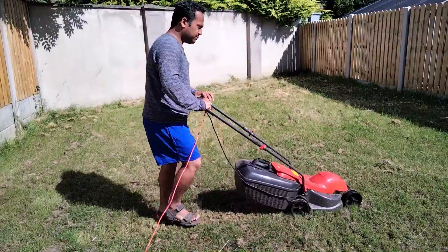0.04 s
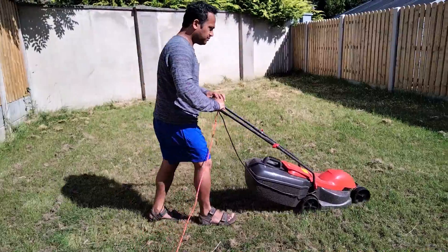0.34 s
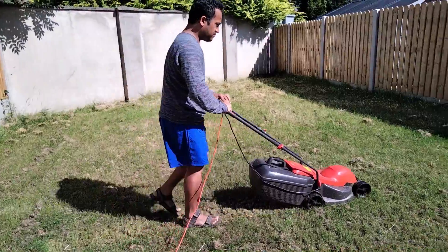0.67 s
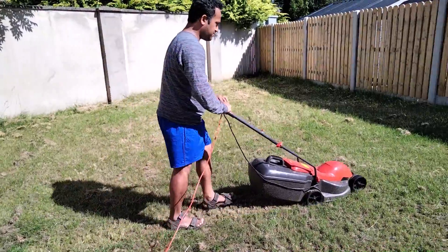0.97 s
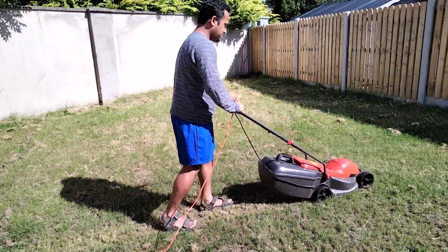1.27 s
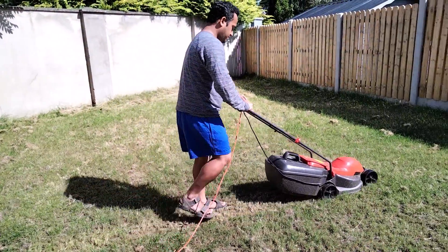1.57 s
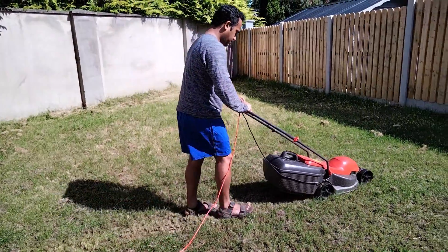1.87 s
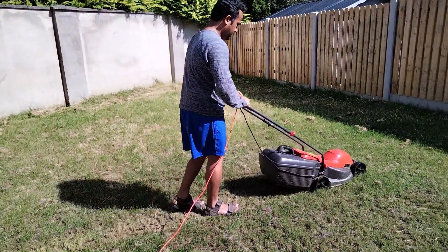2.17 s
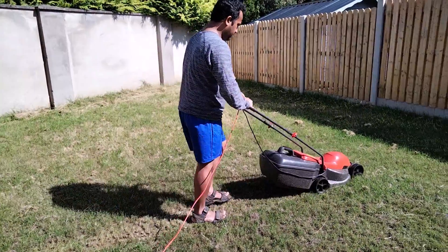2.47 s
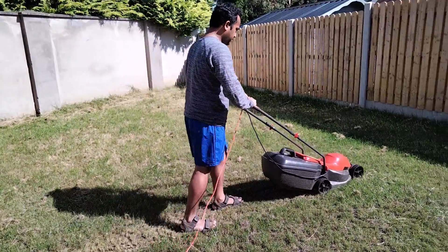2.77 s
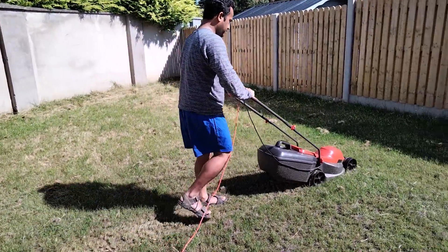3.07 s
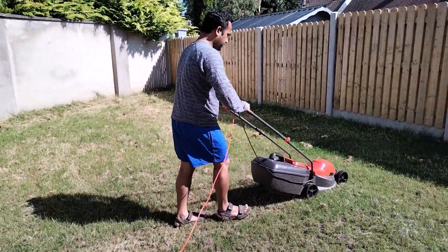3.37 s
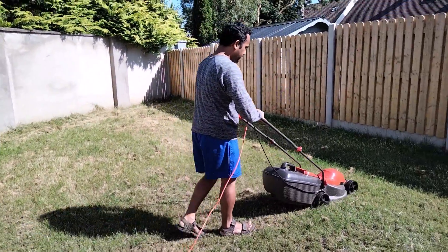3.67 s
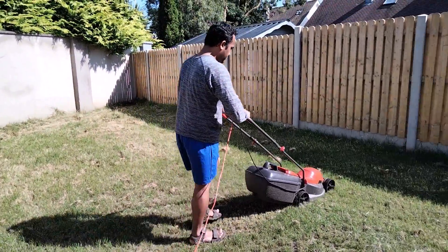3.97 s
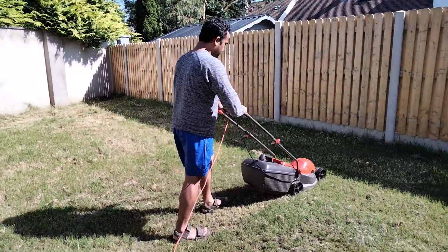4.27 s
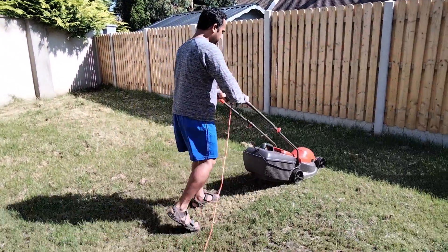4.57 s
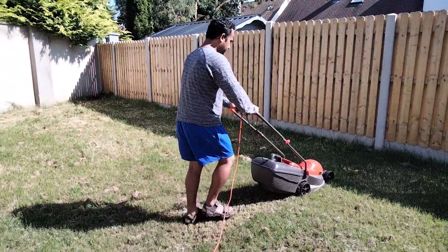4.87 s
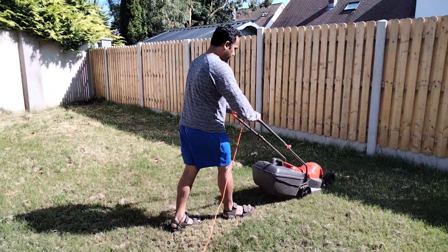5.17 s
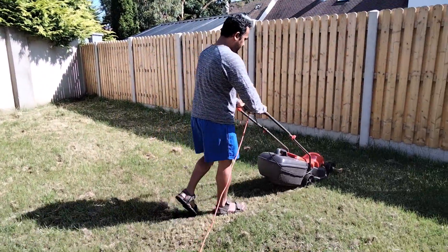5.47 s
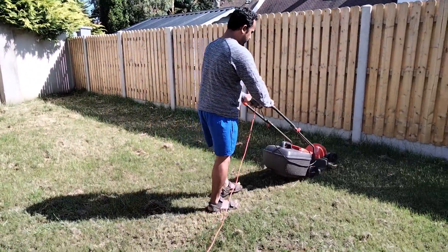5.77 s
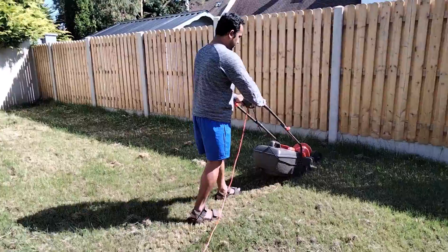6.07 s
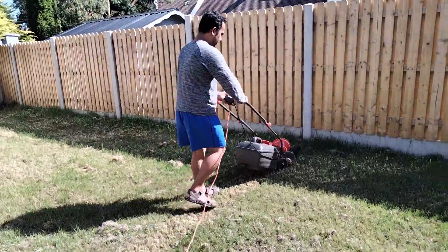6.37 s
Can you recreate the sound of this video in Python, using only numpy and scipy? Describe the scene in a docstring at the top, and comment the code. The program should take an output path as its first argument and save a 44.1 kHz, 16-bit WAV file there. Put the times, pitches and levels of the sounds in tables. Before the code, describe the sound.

An electric lawnmower runs from start to finish, a few metres away on a garden lawn. The blade gives a low, churning drone, topped by a bright hiss of cut grass, gritty rushing air and a thin, wavering motor whine. Light wind rumbles on the microphone around 0.5 seconds. Twigs and grit tick sharply on the plastic housing at about 1.4, 1.6 and 2.5 seconds, more faintly at 3.1 and 4.6, then in a small cluster from 5 to 5.3 seconds. The level often ducks for an instant just after these hits. The pitch sinks as the blade bogs down in thicker grass around 3.2 seconds, recovers by 4, then sinks again near 6.2 and starts to rise. Here and there the sound turns hollow for a split second. The mower is still cutting at the end, about 6.6 seconds in.

```python
"""A corded electric rotary mower hums and hisses across a fenced lawn, a few metres away.
The blade drones and churns the air in the deck, bogging down in thicker grass; cut stalks hiss,
the belt-driven motor whines, and twigs tick on the housing. The level sags now and then,
the midrange drops out for instants, and a little wind brushes the microphone."""
import sys
import numpy as np
from scipy import signal
from scipy.fft import rfft, irfft
from scipy.io import wavfile

SR = 44100
rng = np.random.default_rng(int(sys.argv[2]) if len(sys.argv) > 2 else 0)


def generate_wav(sig):
    """Save sig (samples, or channels by samples) to the path in sys.argv[1] as 16-bit PCM at SR."""
    pcm = np.round(np.clip(np.atleast_2d(sig).T, -1, 1) * 32767).astype(np.int16)
    wavfile.write(sys.argv[1], SR, pcm)


N = 292508
T = np.arange(N) / SR

# how fast the blade turns: time_s, speed_hz
BLADE_SPEED = [(0.0, 56.2), (0.09, 55.04), (1.16, 58.2), (1.53, 55.37), (1.94, 57.18), (2.68, 54.66),
               (2.88, 51.6), (2.99, 51.1), (3.21, 47.36), (3.49, 52.5), (3.75, 53.06), (4.03, 55.67),
               (4.25, 53.72), (4.6, 53.36), (4.76, 51.93), (5.3, 54.21), (5.87, 51.89), (6.18, 47.3),
               (6.41, 49.88), (6.63, 51.6)]
# fader rides on the main layers: time_s, blade_pass_db, octave_db, churn_db, hiss_db
LAYER_RIDES = [(0.0, -35, -28, -27.5, -20.5), (0.35, -31, -20, -23, -21.5),
               (1.24, -31.0, -20, -25.5, -22.0), (1.88, -30.0, -23, -25.5, -20),
               (2.26, -32.0, -24.5, -24.5, -20), (2.45, -32, -27.5, -27.0, -21),
               (3.05, -29.5, -24.0, -24.0, -19.5), (3.38, -37, -32.5, -28, -23.0),
               (3.53, -27, -19, -22.5, -20.5), (3.81, -30.5, -30.5, -27, -20.5),
               (4.04, -31.5, -21.5, -23.5, -19), (4.26, -31.0, -24.5, -25.5, -20),
               (4.87, -27.5, -32, -27.0, -19.5), (5.13, -30, -25, -27.5, -19.5),
               (5.61, -31.5, -25, -28.5, -20), (6.05, -31, -24.0, -25.5, -19),
               (6.22, -39.5, -27.5, -30.5, -21), (6.63, -33, -34, -28.5, -21)]
# weaker lines swell and fade as the mower turns; the first three ride on the hiss fader, the last
# on the octave: time_s, drone_db, whine_db, whistle_db, imbalance_db
TONE_RIDES = [(0, -17, -15, -18, -21), (.9, -20.5, -14.5, -6, -15.5), (2.1, -8.5, -24.5, -11.5, -7.5),
              (2.9, -16.5, -17.5, -18, -18), (3.9, -12, -11, -24.5, -11), (4.8, -11, -18.5, -12, -10.5),
              (5.4, -13.5, -18.5, -20, -16.5), (6.63, -19.5, -23, -5, -14)]
# upper blade harmonics, on the churn fader: order, level_db, roughness, full_load_change_db
CHOP_HARMONICS = [(5, -9.5, 0.5, -9), (6, -3, 0.18, -4), (7, -11.5, 0.5, -9.5), (8, -13.5, 0.31, 7),
                  (9, -11.5, 0.4, -14.5), (10, -12.5, 0.5, 7), (11, -18, 0.6, -5), (12, -18.5, 0.4, 3),
                  (13, -27.5, 0.4, -5), (14, -20, 0.8, -9), (16, -21.5, 0.4, -13.5), (18, -30, 0.7, -8),
                  (20, -23.5, 0.7, -7), (22, -27.5, 0.3, 3), (24, -31.5, 0.2, 8), (30, -30, 0.7, 4.5),
                  (32, -31, 0.7, 11.5)]
# thick tufts push up the chop and, by less, the hiss: centre_s, half_width_s, boost_db
THICK_TUFTS = [(2.37, .05, 4), (2.77, 0.015, 6.5), (3.04, 0.062, 2.5), (3.49, 0.045, 4.5), (4.07, 0.046, 1),
               (4.74, 0.033, 4), (4.87, 0.046, 2), (5.23, 0.032, 4), (6.02, .06, 1), (6.35, .03, 6.5)]
# EQ of the air churning in the deck: frequency_hz, gain_db
DECK_EQ = [(60, -19.5), (110, -7), (165, -6.5), (230, 0), (310, 1), (400, -3), (530, -5.5), (610, -9),
           (730, -21), (1100, -44)]
# EQ of the cutting hiss: frequency_hz, gain_db
GRASS_EQ = [(5000, -42), (5500, -8), (5750, -5.5), (6000, -4), (6300, 2.5), (6650, -.5), (7000, 0.5),
            (7550, 0), (7800, -2.5), (8000, -15.5), (8250, -18), (8500, -29.5)]
# EQ of the cooling air: frequency_hz, gain_db
AIR_EQ = [(400, 0), (750, -9.5), (1000, -8.5), (1300, -7.5), (1650, -8.5), (2000, -10), (2350, -7),
          (2700, -2.5), (3100, -1.5), (3450, -2.5), (4300, -2), (4800, -1.5), (5250, -5.5), (5600, -7),
          (6100, -30)]
# EQ of the plastic housing's ring: frequency_hz, gain_db
HOUSING_EQ = [(3400, -6.5), (3700, -7.5), (3840, 3.5), (3980, -9), (4250, -30.5)]
# twigs and grit hitting the mower: start_s, peak_db, centre_hz, bandwidth_hz, t60_s
TWIG_HITS = [(1.369, -5, 3600, 2600, 0.016), (1.378, -12, 2900, 1800, 0.025),
             (1.587, -6.5, 4440, 3200, .02), (1.596, -6.5, 6000, 3400, .02), (2.49, -11, 2903, 555, 0.034),
             (3.081, -16.5, 2507, 2020, 0.026), (4.609, -12, 3240, 1998, 0.022),
             (4.982, -10, 6380, 2014, .015), (5.012, -7, 5940, 620, 0.15), (5.044, -10, 6240, 2200, 0.013),
             (5.269, -3, 6505, 2220, 0.015), (5.308, -14, 3800, 1983, 0.046)]
# EQ of the wind rumble: frequency_hz, gain_db
WIND_EQ = [(8, 5.5), (25, -2), (42, 7), (60, 3), (85, -5), (160, -28)]
# gusts on the microphone: centre_s, half_width_s, level_db
GUSTS = [(0.414, 0.026, -38), (0.48, 0.034, -25), (0.648, .03, -44), (.78, .025, -36), (4.466, .06, -44),
         (4.948, .1, -58)]
# dips in level, mostly just after a strike or a tuft: start_s, length_s, hum_depth_db, hiss_depth_db
LEVEL_SAGS = [(1.37, .09, 6, 2), (1.576, 0.11, 9.5, 9.5), (2.5, 0.095, 9, 6), (2.778, .1, 9.5, 4.5),
              (3.087, 0.15, 2.5, -1.5), (4.105, 0.11, 3.5, 3), (4.928, 0.082, 3, 4), (5.007, .11, 7.5, 7.5),
              (5.25, 0.13, 12, 5.5), (6.125, 0.062, 6, -0.5), (6.42, .099, 3, 3)]
# brief holes in the midrange, the deeper the longer: centre_s, depth_db
MID_DROPOUTS = [(0.401, 17), (.867, 7), (1.401, 17), (2.15, 14), (2.19, 21), (2.471, 24), (2.542, 32),
                (2.771, 19.5), (2.857, 14), (2.933, 23), (3.068, 15), (3.133, 13), (3.193, 15),
                (3.69, 18.5), (3.887, 28), (3.962, 16), (5.092, 20), (5.16, 17), (5.459, 15), (5.586, 19),
                (6.096, 21), (6.141, 18), (6.286, 17), (6.457, 21), (6.501, 21)]

FREE_HZ, LOADED_HZ = 58, 48  # blade speed at no load and at full load
BELT_RATIO, ARMATURE_SLOTS = 4.603, 12
WHISTLE_ORDER, BLADE_PASS_ORDER = 133, 2  # multiples of the blade speed
COOLING_DB, RING_DB = (-5.5, -7.5), (-10.5, -18.5)  # on the hiss fader: (side-on, facing away)
TUFT_HISS_SHARE, BREEZE_DB, TOP_HZ = 0.43, -55, 8400
HUM_FALL_S, HISS_FALL_S, RECOVER_S = 0.011, 0.045, 0.033
DROPOUT_LOW_HZ, DROPOUT_HIGH_HZ, DROPOUT_DB_PER_S = 620, 5760, 1399


def blade(turns, load, tuft_db, pass_db, octave_db, churn_db, imbalance_db):
    """Two tips hum at twice the blade speed, imbalance adds an odd order, and tufts harden the chop."""
    blade_pass = tone(turns, BLADE_PASS_ORDER, rough=0.042, flutter_hz=17)
    octave = undb(-2) * tone(turns, order=4, rough=0.072, flutter_hz=11)
    imbalance = undb(imbalance_db) * tone(turns, order=3, rough=0.16, flutter_hz=12)
    chop = 0
    for order, db, rough, load_db in CHOP_HARMONICS:
        # the gap between deck and lawn keeps changing, so each harmonic swells and fades on its own
        swell_db = 2 * walk(7)
        chop += undb(db + load * load_db + swell_db) * tone(turns, order, rough, flutter_hz=21)
    wakes = colour(rng.standard_normal(N) * tip_pulse(turns, depth=0.66), DECK_EQ)
    wakes *= undb(1.6 * walk(9.3))
    churn = undb(tuft_db - 0.53) * chop + undb(-4.5) * wakes
    return undb(pass_db) * blade_pass + undb(octave_db) * (octave + imbalance) + undb(churn_db) * churn


def grass(turns):
    """Countless stalks snap at the blade tips and melt into the hiss of the air."""
    cuts = snaps(per_second=3000, spread_db=1.5) * tip_pulse(turns, depth=0.55)
    return colour(rng.standard_normal(N) + 0.54 * cuts, GRASS_EQ) * undb(0.97 * walk(28))


def cooling_air(turns):
    """Air and clippings rush through the housing in a gritty stream."""
    rush = rng.standard_normal(N) + 0.5 * snaps(per_second=900, spread_db=1)
    return colour(rush * tip_pulse(turns, depth=0.032), AIR_EQ) * undb(0.78 * walk(24))


def motor(turns, drone_db, whine_db, whistle_db):
    """The motor outruns the blade it belts: shaft drone and buzz, slot whine, a thin whistle on top."""
    shaft = BELT_RATIO * turns
    drone = tone(shaft, order=1, rough=0.25, flutter_hz=10)
    buzz_orders = (15, 16, 19, 20, 22, 24, 25, 26, 27, 28)
    buzz = sum(tone(shaft, order, rough=0.85, flutter_hz=10) for order in buzz_orders)
    whine = tone(shaft, ARMATURE_SLOTS, rough=0.7, flutter_hz=22)
    # the load changes with each blade pass, which puts a second line under the whine
    sideband = tone(turns, ARMATURE_SLOTS * BELT_RATIO - BLADE_PASS_ORDER, rough=0.98, flutter_hz=15)
    whistle = tone(turns, WHISTLE_ORDER, rough=0.9, flutter_hz=45)
    return (undb(drone_db) * drone + undb(-26.5) * buzz
            + undb(whine_db) * (whine + undb(-10.5) * sideband) + undb(whistle_db) * whistle)


def housing():
    """Clippings rasp on the plastic shell and keep one resonance ringing."""
    return colour(rng.standard_normal(N), HOUSING_EQ)


def twigs():
    """Each hit is a sharp click, then a short rattle in a cluster of plastic resonances."""
    out = np.zeros(N)
    t = T[:SR // 4]
    for start_s, peak_db, centre_hz, width_hz, t60_s in TWIG_HITS:
        rattle = rng.standard_normal(len(t)) * undb(-60 * t / t60_s)
        click = 9 * (t == 0)
        edges_hz = [centre_hz - width_hz / 2, centre_hz + width_hz / 2]
        ring = signal.sosfilt(signal.butter(3, edges_hz, "band", fs=SR, output="sos"), click + rattle)
        start = int(start_s * SR)
        out[start:start + len(t)] += (undb(peak_db) * ring / np.abs(ring).max())[:N - start]
    return out


def wind():
    """A light breeze and a few gusts rumble on the microphone."""
    gusts = swells([(centre_s, half_s, undb(db)) for centre_s, half_s, db in GUSTS])
    return colour(rng.standard_normal(N), WIND_EQ) * (undb(BREEZE_DB + 2.5 * walk(3)) + gusts)


def sags():
    """The hum ducks first, the hiss follows, and both recover together: dB lost by each."""
    hum_db, hiss_db = 0, 0
    for start_s, length_s, hum_depth_db, hiss_depth_db in LEVEL_SAGS:
        age_s = T - start_s
        held = np.clip(1 - (age_s - length_s) / RECOVER_S, 0, 1)
        hum_db += hum_depth_db * held * np.clip(age_s / HUM_FALL_S, 0, 1)
        hiss_db += hiss_depth_db * held * np.clip(age_s / HISS_FALL_S, 0, 1)
    return hum_db, hiss_db


def midrange_dropouts(x):
    """The mids duck and return at a set rate while lows and highs carry on."""
    hz = np.arange(N // 2 + 1) * SR / N
    mids = irfft(rfft(x) * (hz > DROPOUT_LOW_HZ) * (hz < DROPOUT_HIGH_HZ), N)
    drop_db = sum(np.maximum(depth_db - DROPOUT_DB_PER_S * np.abs(T - centre_s), 0)
                  for centre_s, depth_db in MID_DROPOUTS)
    return x - mids * (1 - undb(-drop_db))


def tone(turns, order, rough, flutter_hz):
    """A line near rms 1 at a multiple of a shaft's speed; turbulence roughens it (0 pure, 1 all noise)."""
    angle = 2 * np.pi * (order * turns + rng.random())
    shaken = walk(flutter_hz) * np.cos(angle) + walk(flutter_hz) * np.sin(angle)
    return np.sqrt(2 * (1 - rough ** 2)) * np.sin(angle) + rough * shaken


def tip_pulse(turns, depth):
    """A tremolo that swells each time one of the two blade tips passes."""
    return 1 + depth * np.cos(2 * np.pi * BLADE_PASS_ORDER * turns)


def snaps(per_second, spread_db):
    """A dense crackle of unequal clicks, at rms 1."""
    size = undb(spread_db * np.minimum(rng.exponential(size=N), 4))
    return unit((rng.random(N) < per_second / SR) * size * rng.standard_normal(N))


def walk(rate_hz):
    """Smooth random drift at rms 1, rolling off above rate_hz."""
    coarse_s = T[::100]
    hz = np.arange(len(coarse_s) // 2 + 1) / T[-1]
    spectrum = rfft(rng.standard_normal(len(coarse_s))) * np.exp(-(hz / rate_hz) ** 2)
    return unit(np.interp(T, coarse_s, irfft(spectrum, len(coarse_s))))


def colour(x, eq):
    """Shape a sound with an EQ curve, then scale it to rms 1."""
    hz, db = np.transpose(eq)
    bins_hz = np.maximum(np.arange(N // 2 + 1) * SR / N, 1)
    gain_db = np.interp(np.log(bins_hz), np.log(hz), db, left=-90, right=-90)
    return unit(irfft(rfft(x) * undb(gain_db), N))


def swells(table):
    """Bell-shaped rises and falls, summed."""
    return sum(height * np.exp(-((T - centre_s) / half_s) ** 2) for centre_s, half_s, height in table)


def curves(table):
    """One automation lane per column after time_s, in straight ramps."""
    time_s, *columns = np.transpose(table)
    return [np.interp(T, time_s, column) for column in columns]


def undb(db):
    """Decibels to gain."""
    return 10 ** (np.asarray(db) / 20)


def unit(x):
    """Scale to rms 1."""
    return x / np.sqrt(np.mean(x ** 2))


def scene():
    """One shaft speed drives blade, motor and cutting; the slower it turns, the heavier the load."""
    speed_hz = curves(BLADE_SPEED)[0]
    load = (FREE_HZ - speed_hz) / (FREE_HZ - LOADED_HZ)
    # the grass tugs at the blade, so all its harmonics waver together
    turns = np.cumsum(speed_hz * (1 + 0.002 * walk(8.16))) / SR
    pass_db, octave_db, churn_db, hiss_db = curves(LAYER_RIDES)
    drone_db, whine_db, whistle_db, imbalance_db = curves(TONE_RIDES)
    hum_sag_db, hiss_sag_db = sags()
    tuft_db = swells(THICK_TUFTS)
    bob_db = 0.62 * walk(18)  # the deck bobs over the lawn and shakes the hum
    hum = blade(turns, load, tuft_db, pass_db, octave_db, churn_db, imbalance_db)
    hum *= undb(bob_db - hum_sag_db)
    hiss_fader = undb(hiss_db - hiss_sag_db + TUFT_HISS_SHARE * tuft_db)
    # air and ring fade as the mower turns steadily from side-on to facing away
    air_db, ring_db = np.linspace(*COOLING_DB, N), np.linspace(*RING_DB, N)
    # the air lies between hum and hiss in pitch, and sags by a depth between theirs
    air_db -= 0.3 * (hum_sag_db - hiss_sag_db)
    rush = undb(-0.07) * grass(turns) + undb(air_db) * cooling_air(turns) + undb(ring_db) * housing()
    whine = hiss_fader * motor(turns, drone_db, whine_db, whistle_db)
    return (midrange_dropouts(hum + hiss_fader * rush) + whine + twigs() + wind())[None]


def record(dry):
    """The recorder soft-clips the highest peaks and cuts the top steeply."""
    rounded = dry / (1 + (dry / 0.7) ** 6) ** (1 / 6)
    return signal.sosfilt(signal.ellip(12, 0.1, 80, TOP_HZ, fs=SR, output="sos"), rounded)


dry = scene()
out = record(dry)
generate_wav(out)
```